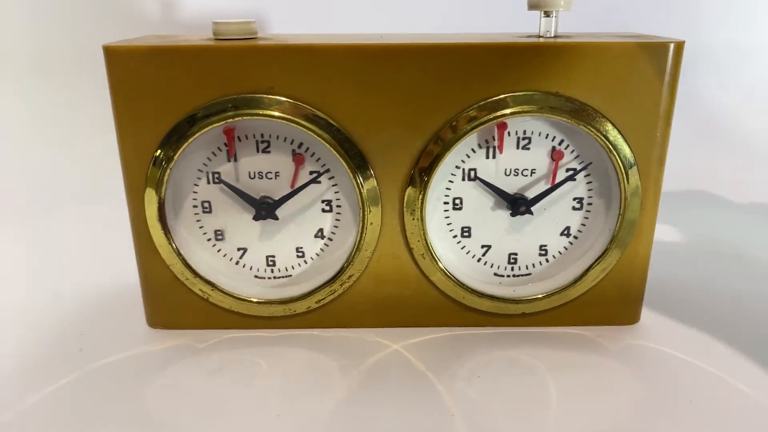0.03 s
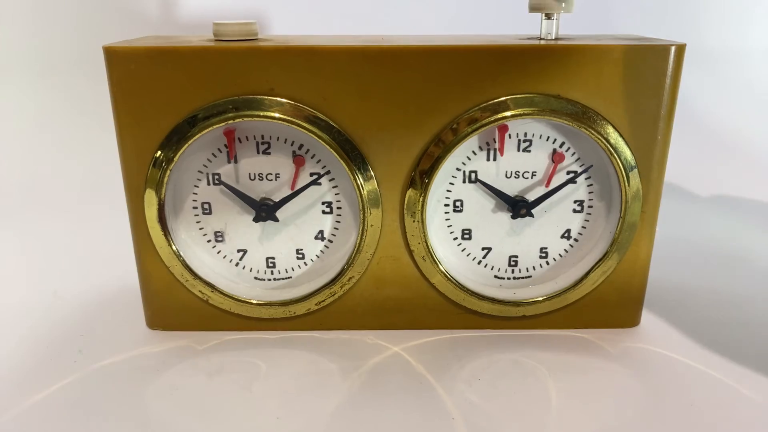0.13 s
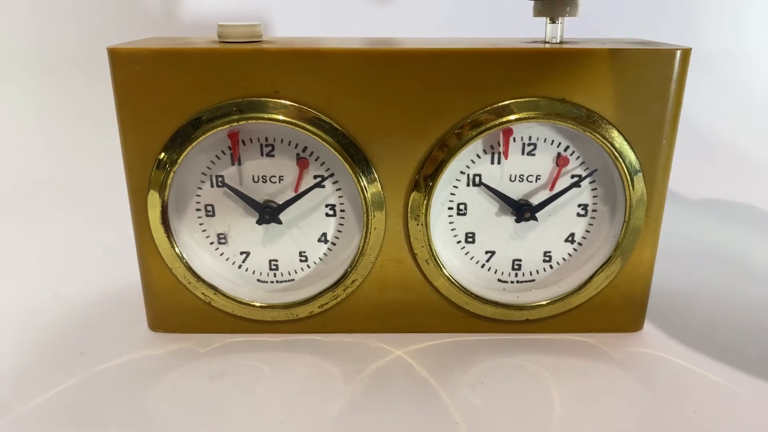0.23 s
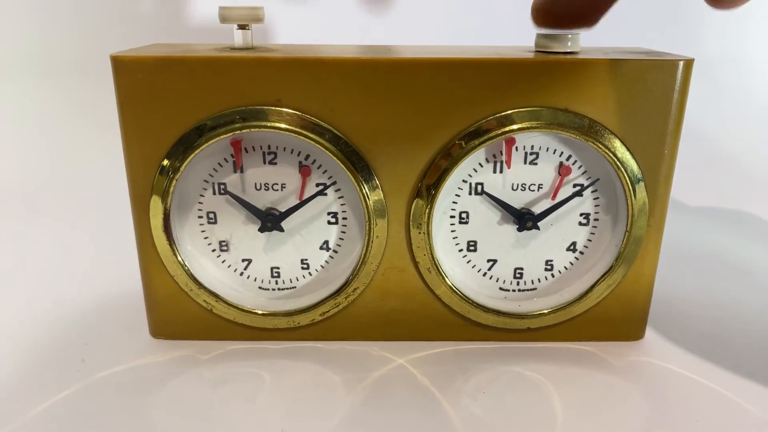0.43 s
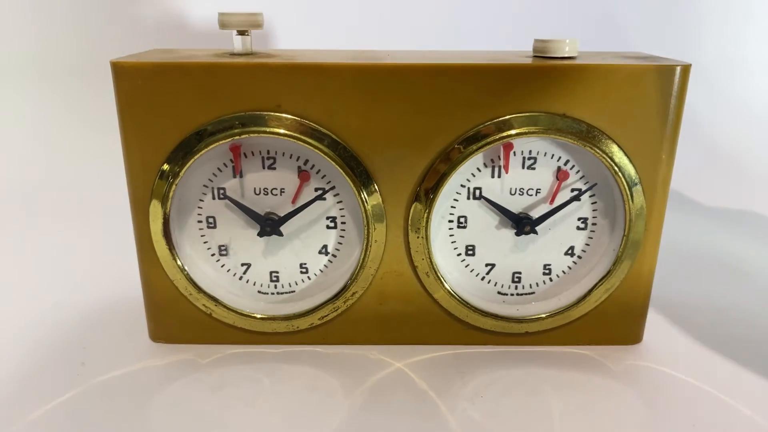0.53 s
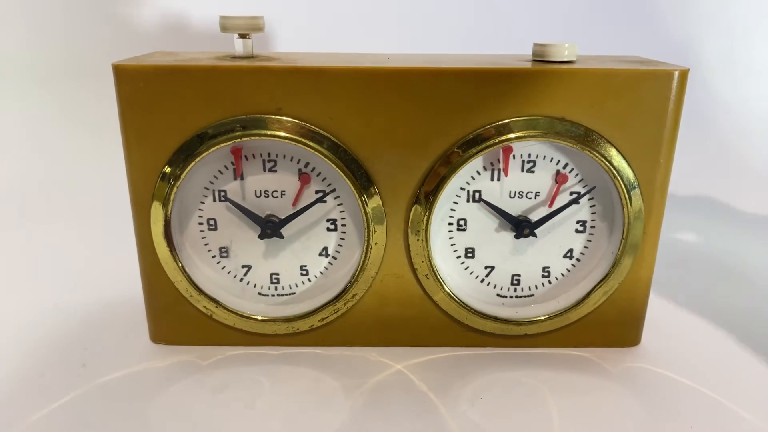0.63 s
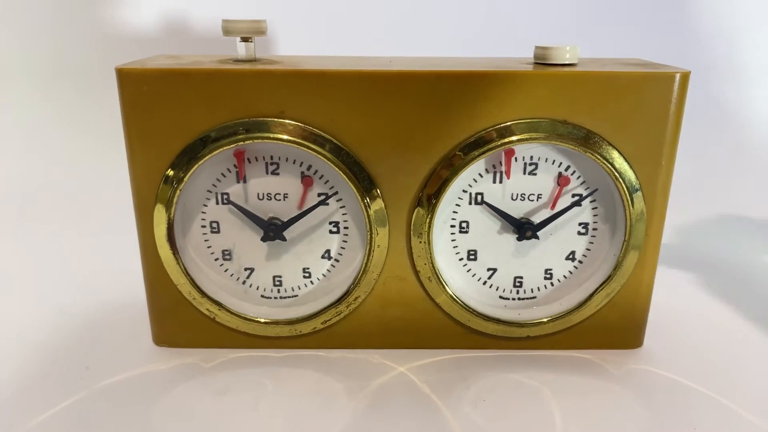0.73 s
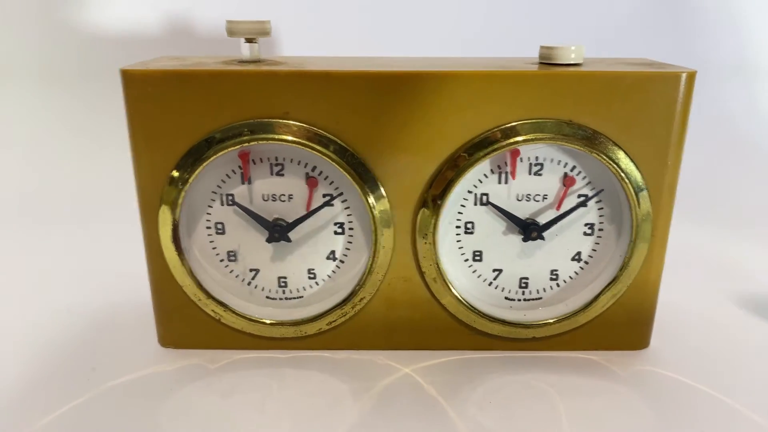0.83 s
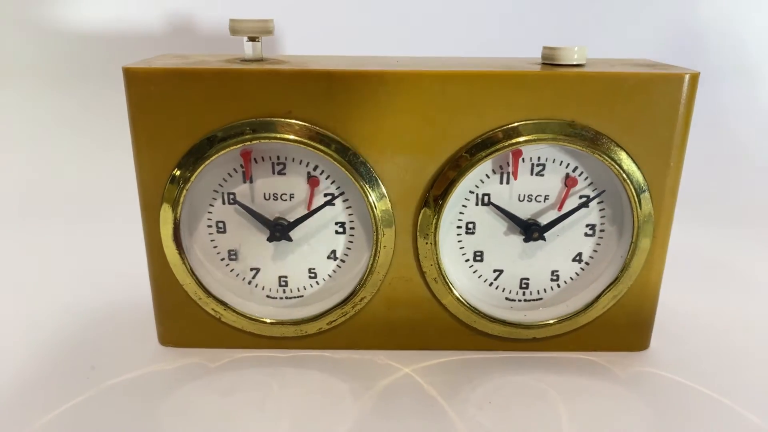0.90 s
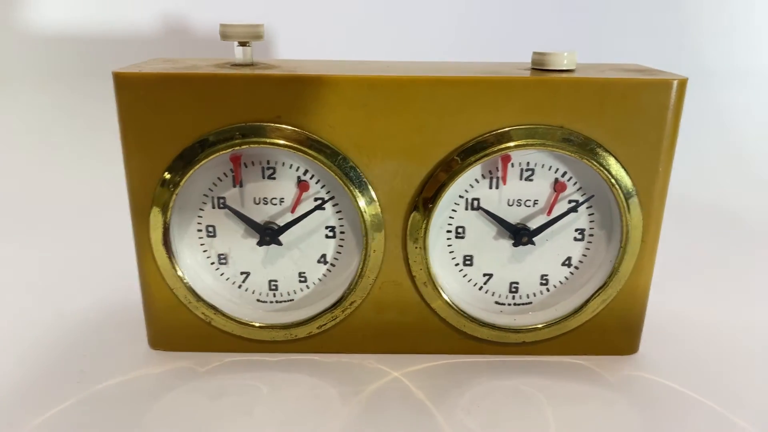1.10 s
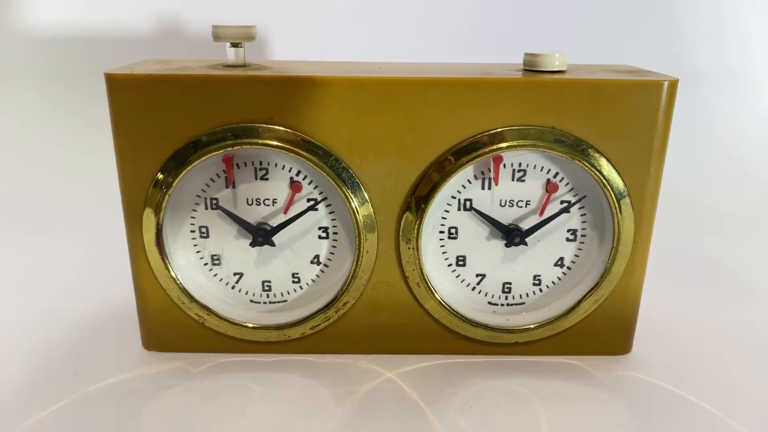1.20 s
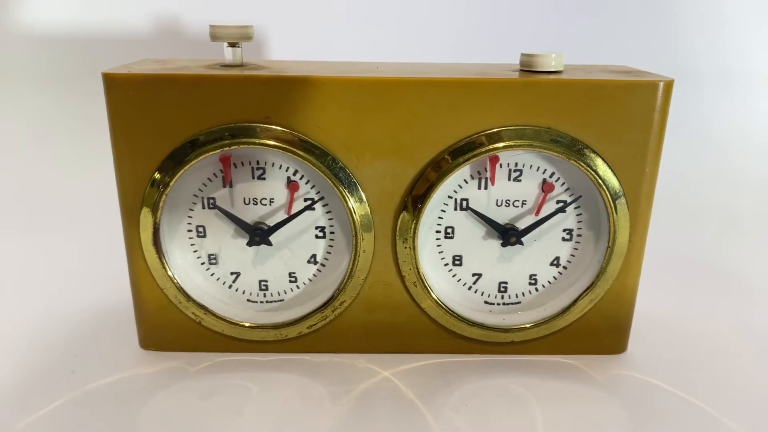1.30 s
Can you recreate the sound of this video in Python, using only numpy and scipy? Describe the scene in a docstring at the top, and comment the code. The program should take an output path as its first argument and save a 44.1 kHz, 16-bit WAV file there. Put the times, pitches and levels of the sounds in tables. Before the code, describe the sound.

A mechanical chess clock button is pressed, heard close by a phone microphone in a quiet room with short echo. One faint tick at 0.07 seconds, light touch at 0.17, then a loud hollow plastic-and-metal clack of rapid blows from 0.21 to 0.27. Soft release bumps around 0.35-0.41, faint sleeve rustle until about 0.6, and small bright ticks every quarter second from 0.47, alternating with dull knocks from 0.6 to 1.32.

```python
"""Quiet room tone and one tick come first; then a finger pushes down the button of a mechanical chess clock.
The rocker clacks in several quick blows that ring the hollow plastic case: sums of decaying modes.
One movement stops and the other ticks, each beat a group of metal contacts with a bright pallet snap.
A sleeve rustles as the hand leaves (resonant noise), and dull regular knocks fall between the ticks.
A noise tail gives the clock a short room echo; a phone microphone stands close by."""
import sys
import numpy as np
from scipy import signal
from scipy.fft import rfft, irfft
from scipy.io import wavfile
from scipy.ndimage import uniform_filter1d

SR = 44100
rng = np.random.default_rng(int(sys.argv[2]) if len(sys.argv) > 2 else 0)


def unload_wav(signal):
    """Save mono or channel-first audio to the path in sys.argv[1] as 16-bit WAV at rate SR, clipped to [-1, 1]."""
    wavfile.write(
        sys.argv[1],
        SR,
        np.round(np.clip(np.atleast_2d(signal).T, -1, 1) * 32767).astype(np.int16),
    )


def nominal_scale(level):
    """Amplitude ratio for a level in decibels (scalar or array-like)."""
    x = np.asarray(level, float) / 20
    return 10 ** x


N = 59535  # samples in the scene

# colour of the room tone, relative density: pitch_hz, level_db
ROOM_COLOUR = [(25, -7), (75, 0.5), (200, -7), (550, -11), (830, -15.5), (1170, -20), (1710, -18),
               (4000, -25.5), (5800, -22.5), (8000, -27.5), (10000, -32), (15600, -37.5)]
# slow change of the room tone around ROOM_DB: time_s, level_db
ROOM_SWELL = [(0, -2), (.3, 0), (.45, -1), (.7, 0), (1.0, -1), (1.35, -2.5)]
ROOM_DB, FLICKER_DB = -64, 2.5

# In mode tables t60_s is the decay by 60 dB, before the fade that ends every strike.
# main modes of the hollow case: pitch_hz, level_db, t60_s
CASE_MODES = [(88.5, -9, 0.11), (176, -13.5, 0.3), (210.7, -6.5, 0.21), (265.3, -3.5, 0.072),
              (285.7, -0.5, 0.13), (332.5, -7, 0.31), (476, -6.5, 0.075), (777, -11, 0.088),
              (1019, -16, 0.21), (1310, -8, 0.037), (1392, -2, 0.077), (1488, 4, 0.057), (1694, -3, 0.033),
              (2630, -19, 0.024)]
# strength of the case's dense small modes: pitch_hz, level_db; then their t60_s at 1 kHz
CASE_DENSE = [(400, -25), (1000, -8), (1600, -11), (2500, -7), (3700, -11.5), (4500, -28)]
CASE_DENSE_T60_S = 0.075
# main modes of the metal works: pitch_hz, level_db, t60_s
WORKS_MODES = [(4025, -11.5, 0.074), (5270, -1.5, 0.014), (6420, -8, 0.022), (7110, -26, 0.019),
               (10050, -25.5, .07)]
# strength of the works' dense small modes: pitch_hz, level_db; then their t60_s at 1 kHz
WORKS_DENSE = [(3500, -17.5), (5000, -13.5), (7000, -6), (8500, -16), (10500, -26), (15500, -26)]
WORKS_DENSE_T60_S = 0.091
# main modes of the bright pallet snap: pitch_hz, level_db, t60_s
PALLET_MODES = [(2815, 10.5, .05), (10600, 3, 0.053), (11500, -2, 0.062)]
# strength of the pallet's dense small modes: pitch_hz, level_db; then their t60_s at 1 kHz
PALLET_DENSE = [(8000, -16), (12000, 0.5), (15500, -7)]
PALLET_DENSE_T60_S = 0.067
# main modes of the dull knocks: pitch_hz, level_db, t60_s
KNOCK_MODES = [(346.6, -12, 0.66), (561.3, 5.5, 0.079), (651, 5.5, 0.16), (839, 7, 0.037), (1137, 4, 0.06),
               (2196, 0, 0.065), (2360, 3, 0.048), (6250, -20, .03)]
# strength of the knocks' dense small modes: pitch_hz, level_db; then their t60_s at 1 kHz
KNOCK_DENSE = [(300, -21.5), (600, -15), (1200, -5), (2200, 0.5), (3200, -1.5), (4500, -31), (7000, -5.5)]
KNOCK_DENSE_T60_S = 0.055

# escapement beats, timed at the drop: start_s, case_db, metal_db, unlock_db, rebound_db
# (the last two are relative to the drop)
TICKS = [(0.0677, -62, -62.5, -30, -30), (0.4695, -59.5, -56, -8, -16), (0.7132, -63.5, -65, -4, 1),
         (0.9626, -56.5, -53, -11.5, -17), (1.2057, -64.5, -61.5, -2, 0.5)]
# how far unlocking precedes the drop; the two swings of the balance differ: lead_s, lead_s
UNLOCK_LEAD_S = (.0272, .031)
# the push and the rebound around the drop: delay_s, added metal_db
IMPULSE = (-.008, -11)
REBOUND = (.016, -5.5)
IMPULSE_DB, UNLOCK_METAL_DB, TICK_BASS_DB = -3.5, -3.5, -12.5
SNAP_DB, SNAP_UNLOCK_DB = -71.5, -8
OLD_SNAP_DB = -2.5  # the movement that is about to stop snaps more softly

# button and rocker blows: start_s, case_bass_db, case_mid_db, metal_db
BLOWS = [(0.171, -56.5, -66.5, -91), (0.188, -52.5, -66.5, -77), (0.2129, -33.5, -47.5, -58),
         (.2180, -37, -50, -47.5), (0.2219, -45, -41, -46), (.2350, -34.5, -36, -42.5),
         (0.2403, -43, -37.5, -45), (0.244, -43, -44.5, -51), (.2490, -53, -51, -53),
         (.2562, -46, -53.5, -45.5), (0.266, -58, -54, -67), (0.382, -54.5, -62.5, -77),
         (.388, -59, -72, -67)]
# soft bumps as finger and hand let go: start_s, pitch_hz, level_db, t60_s
BUMPS = [(.355, 350, -60, 0.066), (.358, 950, -61, 0.08), (.372, 744, -56, 0.14),
         (.376, 1016, -51.5, 0.064), (.390, 493, -53, .08), (.400, 600, -55.5, 0.045),
         (.412, 121, -54.5, 0.065), (.540, 88, -50, 0.052)]
BUMP_SPREAD = 0.117  # offset of the side modes, as a share of the pitch

# sleeve resonances that swell and fade: pitch_hz, width_hz of each of two passes, level_db at the peak,
# centre_s, spread_s from the peak to 1/e of it
RUSTLE = [(4930, 760, -68, 0.44, 0.028), (4100, 950, -69.5, 0.52, 0.018), (3180, 840, -68.5, 0.5, 0.078),
          (5140, 2600, -74, 0.54, 0.079), (10030, 1700, -75.5, 0.528, 0.084)]
# dull knocks: start_s, level_db, contact_ms
KNOCKS = [(0.5991, -55, 0.075), (0.8413, -60.5, 0.36), (1.0770, -67, 0.53), (1.3171, -64, 0.56)]
KNOCK_SPACING_S = .004  # between the contacts of one knock

SCATTER_DB = 1.2  # chance spread of each mode's level
BASS_TOP_HZ = 600  # crossover between a strike's bass level and its main level
ECHO_DB, ECHO_T60_S, ECHO_TOP_HZ = -16.5, 0.2, 4300
KNOCK_ECHO_DB = 1  # extra share of the knocks sent to the echo, on top of their share in the clock
MIC_BASS_HZ = 47


def walk(rate):
    """Slow random modulation: levels held 1 / rate s and slewed, with a spread near 1."""
    hold = int(SR / rate)
    steps = np.repeat(rng.standard_normal(N // hold + 1), hold)
    slewed = uniform_filter1d(uniform_filter1d(steps, hold), hold)
    return 1.06 * slewed[:N]


def room_tone():
    """Broadband noise shaped by a spectral envelope: its half-octave bands fluctuate independently."""
    f = np.maximum(np.fft.rfftfreq(N, 1 / SR), 1)
    hz_points, db_points = np.array(ROOM_COLOUR).T
    colour = nominal_scale(np.interp(np.log(f), np.log(hz_points), db_points))
    out = 0
    for hz in 20 * 2 ** np.arange(0, 10, .5):
        share = np.maximum(1 - 2 * np.abs(np.log2(f / hz)), 0) ** .5  # overlapping shares sum to 1 in power
        flicker = nominal_scale(FLICKER_DB * walk(12.04))
        out = out + flicker * irfft(rfft(rng.standard_normal(N)) * colour * share, N)
    swell_db = np.interp(np.arange(N) / SR, *np.array(ROOM_SWELL).T)
    return out / out.std() * nominal_scale(ROOM_DB + swell_db)


def add(out, start, sound):
    """Superposition: mix a sound in at a time in seconds."""
    i = int(start * SR)
    out[i:i + len(sound)] += sound[:N - i]


def dense(strength, t60_s, count=50):
    """High modal density: many small modes at chance pitches, the higher ones damped sooner."""
    hz_points, db_points = np.array(strength).T
    place = (np.arange(count) + rng.random(count)) / count
    hz = hz_points[0] * (hz_points[-1] / hz_points[0]) ** place
    mode_db = np.interp(np.log(hz), np.log(hz_points), db_points)
    return list(zip(hz, mode_db, t60_s * (1000 / hz) ** .5))


def strike(modes, small, db, bass_db=None, contact_ms=0., onset_s=0.00069):
    """Modal superposition: a short contact rings every mode, a longer contact is duller."""
    hz, mode_db, t60 = np.array(modes + small).T[:, :, None]
    t = np.arange(SR // 5) / SR
    if bass_db is not None:
        db = db + (bass_db - db) / (1 + (hz / BASS_TOP_HZ) ** 4)
    scatter_db = SCATTER_DB * rng.standard_normal(hz.shape)
    gain = nominal_scale(db + mode_db + scatter_db) / (1 + (hz * contact_ms / 1000) ** 2)
    # main modes follow the push, neighbours in opposite directions; the small ones start at chance phases
    k = np.arange(len(hz))[:, None]
    turns = np.where(k < len(modes), k / 2, rng.random(hz.shape))
    # each mode turns and shrinks by a constant factor per sample
    ring = np.exp((2j * np.pi * hz - np.log(1000) / t60) / SR) * np.ones(len(t))
    ring[:, :1] = gain * np.exp(2j * np.pi * turns)
    ringing = np.cumprod(ring, axis=1).sum(axis=0).imag
    onset = 1 - np.exp(-t / onset_s)
    fade = np.cos(t / t[-1] * np.pi / 2)
    return ringing * onset * fade


def case(db, bass_db):
    """Shell resonance: the hollow plastic case rings, its bass with a strength of its own."""
    return strike(CASE_MODES, dense(CASE_DENSE, CASE_DENSE_T60_S), db, bass_db)


def metal(db):
    """Hard impact: metal on metal inside the works excites high modes with an abrupt onset."""
    return strike(WORKS_MODES, dense(WORKS_DENSE, WORKS_DENSE_T60_S), db, onset_s=0.000094)


def pallet_snap(db):
    """Small stiff body: the pallet's modes lie high and give a bright snap."""
    small = dense(PALLET_DENSE, PALLET_DENSE_T60_S, count=20)
    return strike(PALLET_MODES, small, db, onset_s=0.00016)


def escapement():
    """Intermittent release: each beat unlocks, pushes, drops and rebounds, too light to move much bass."""
    out = np.zeros(N)
    for k, (s, case_db, metal_db, unlock_db, rebound_db) in enumerate(TICKS):
        lead = -UNLOCK_LEAD_S[k % 2]
        unlock, drop = (lead, UNLOCK_METAL_DB), (0, 0)
        parts = [(unlock, unlock_db), (IMPULSE, IMPULSE_DB), (drop, 0), (REBOUND, rebound_db)]
        for (delay, extra_metal_db), db in parts:
            body = case(case_db + db, case_db + db + TICK_BASS_DB)
            add(out, s + delay, body + metal(metal_db + extra_metal_db + db))
        snap_db = SNAP_DB + (OLD_SNAP_DB if k == 0 else 0)
        for delay, db in [(lead, SNAP_UNLOCK_DB), (0, 0)]:
            add(out, s + delay, pallet_snap(snap_db + db))
    return out


def button():
    """Repeated impact: touch, rocker clack and release strike case and works; soft bumps follow."""
    out = np.zeros(N)
    for s, bass_db, mid_db, metal_db in BLOWS:
        add(out, s, case(mid_db, bass_db) + metal(metal_db))
    for s, hz, db, t60 in BUMPS:
        modes = [(hz, 0, t60), (hz * (1 + BUMP_SPREAD), -6, t60), (hz * (1 - BUMP_SPREAD), -6, t60)]
        add(out, s, strike(modes, [], db, onset_s=0.0034))
    return out


def band(x, hz, width):
    """Simple resonance: a two-pole filter with gain 1 at the centre."""
    return signal.lfilter(*signal.iirpeak(hz, hz / width, fs=SR), x)


def rustle():
    """Cloth friction: flickering noise in a few passing resonances."""
    t, out = np.arange(N) / SR, 0
    for hz, width, db, centre, spread in RUSTLE:
        noise = band(band(rng.standard_normal(N), hz, width), hz, width)
        flicker = nominal_scale(db + 1.5 * walk(60))
        swell = np.exp(-((t - centre) / spread) ** 2)
        out = out + flicker * swell * noise / noise.std()
    return out


def knocks():
    """Contact duration limits the treble: each dull knock is a blow and two quick weaker contacts."""
    out = np.zeros(N)
    for s, db, contact_ms in KNOCKS:
        for k, fall_db in enumerate((0, -3, -8)):
            small = dense(KNOCK_DENSE, KNOCK_DENSE_T60_S)
            blow = strike(KNOCK_MODES, small, db + fall_db, contact_ms=contact_ms, onset_s=0.00024)
            add(out, s + k * KNOCK_SPACING_S, blow)
    return out


def room_echo(source):
    """Diffuse reverberation: convolution with a decaying noise tail, its treble softened."""
    t = np.arange(SR // 2) / SR
    decay = np.exp(-np.log(1000) * t / ECHO_T60_S)
    tail = rng.standard_normal(len(t)) * decay * (t > .004)  # a short gap precedes the reflections
    tail = signal.lfilter(*signal.butter(1, ECHO_TOP_HZ, fs=SR), tail)
    unit_tail = tail / np.sqrt(np.sum(tail ** 2))
    return nominal_scale(ECHO_DB) * signal.fftconvolve(source, unit_tail)[:N]


def scene():
    """Linear superposition of clock, room echo, sleeve and room tone."""
    far = knocks()
    clock = button() + escapement() + far
    echo = room_echo(clock + nominal_scale(KNOCK_ECHO_DB) * far)
    return (clock + echo + rustle() + room_tone())[None]


def top_cut(x):
    """Nothing passes above the cut-off."""
    return signal.sosfilt(signal.butter(12, 15700, fs=SR, output="sos"), x)


def record(dry):
    """High-pass response: the phone microphone cuts the deep bass."""
    bass_cut = signal.butter(6, MIC_BASS_HZ, "high", fs=SR, output="sos")
    mix = signal.sosfilt(bass_cut, dry)
    return top_cut(mix)


dry = scene()
out = record(dry)
unload_wav(out)
```